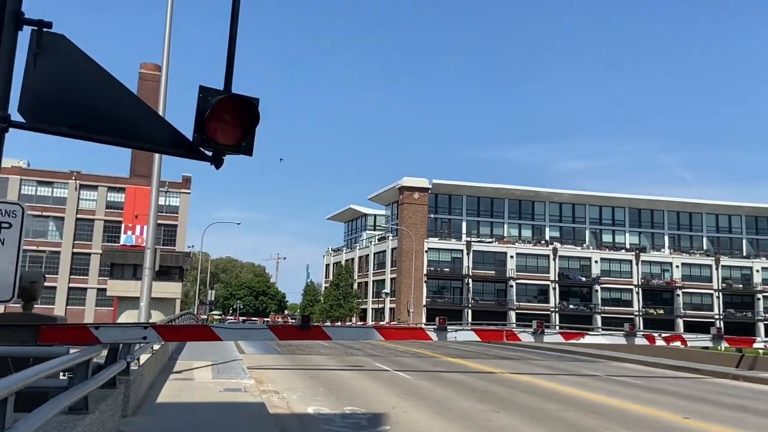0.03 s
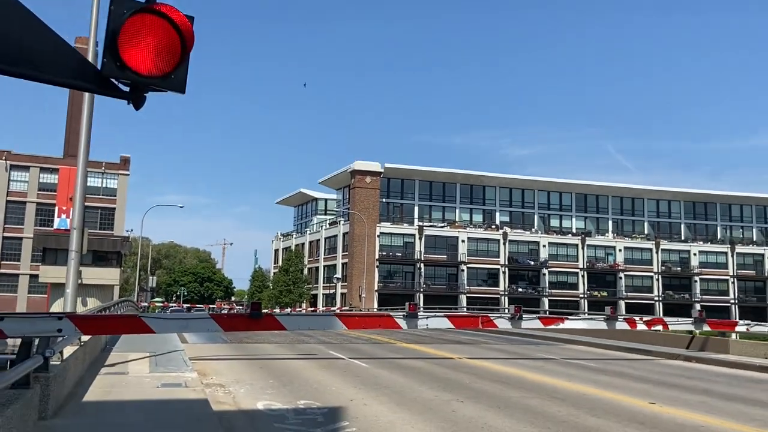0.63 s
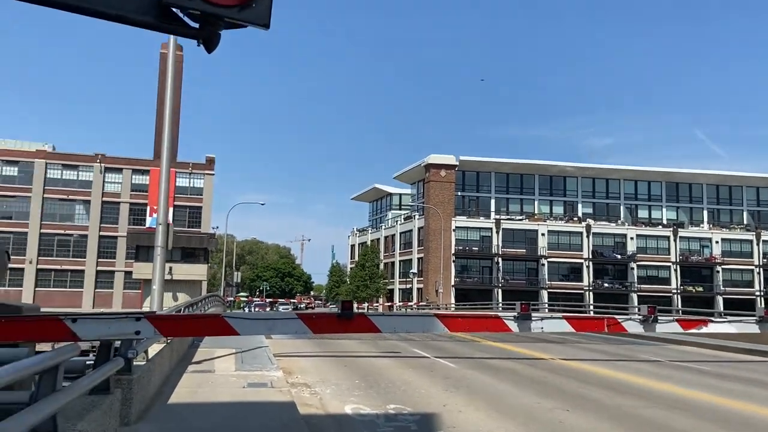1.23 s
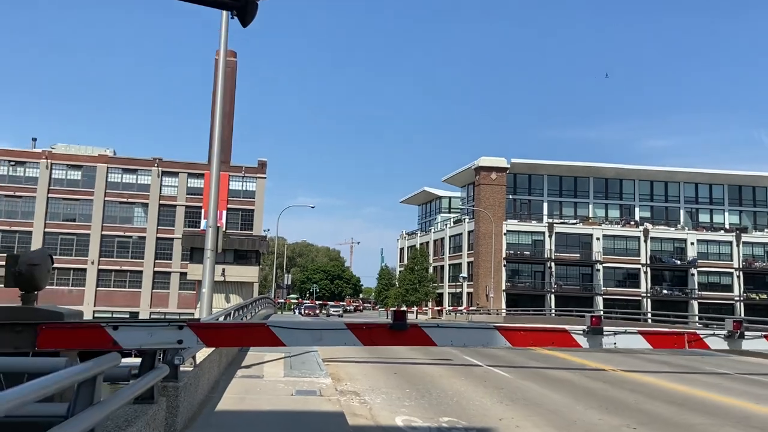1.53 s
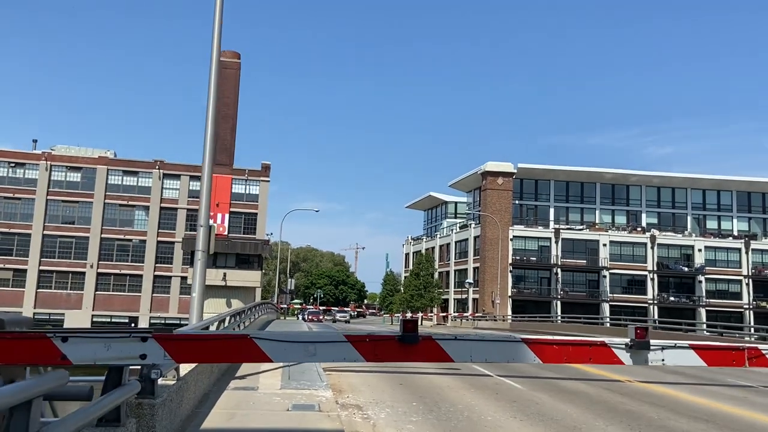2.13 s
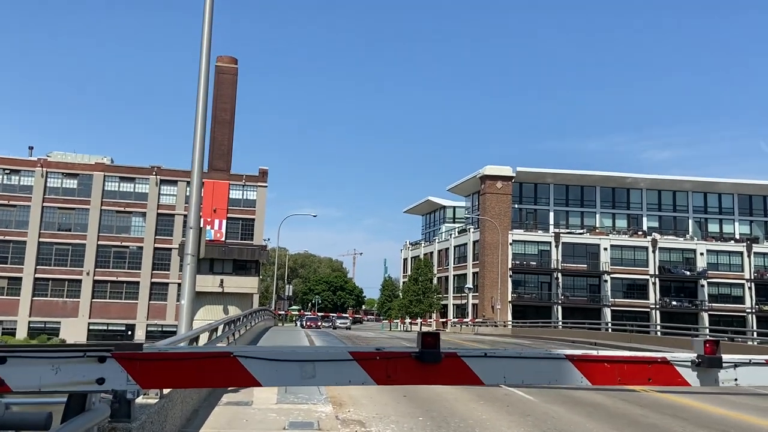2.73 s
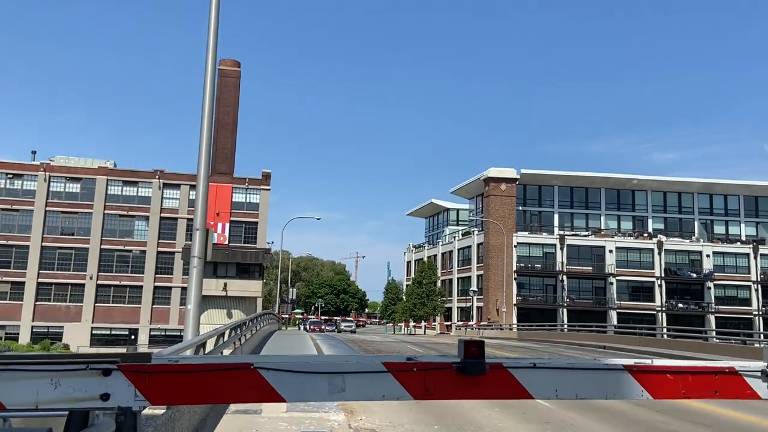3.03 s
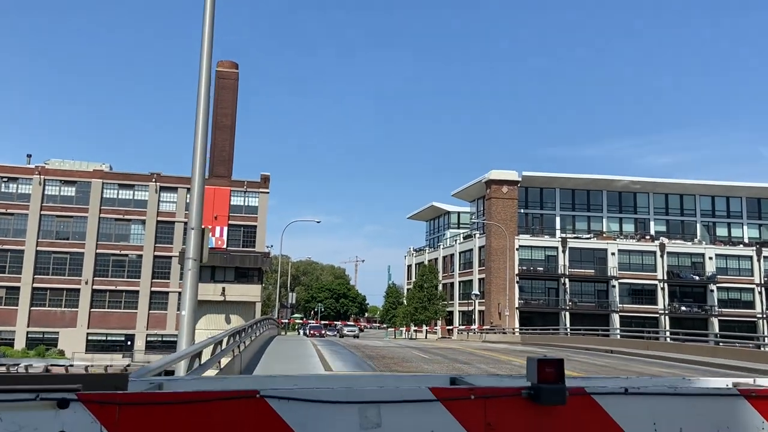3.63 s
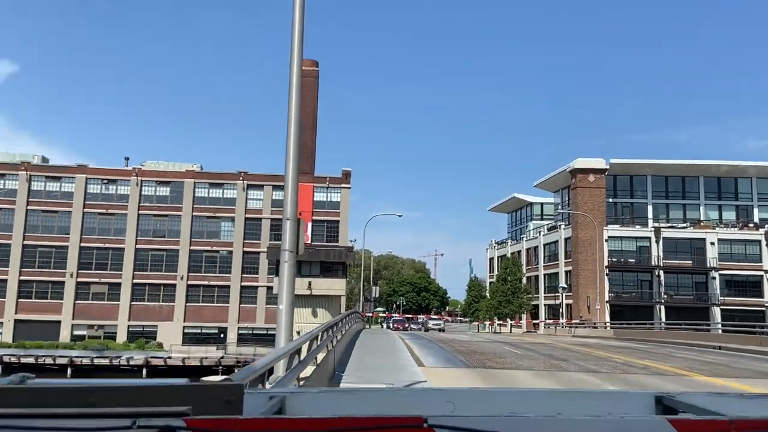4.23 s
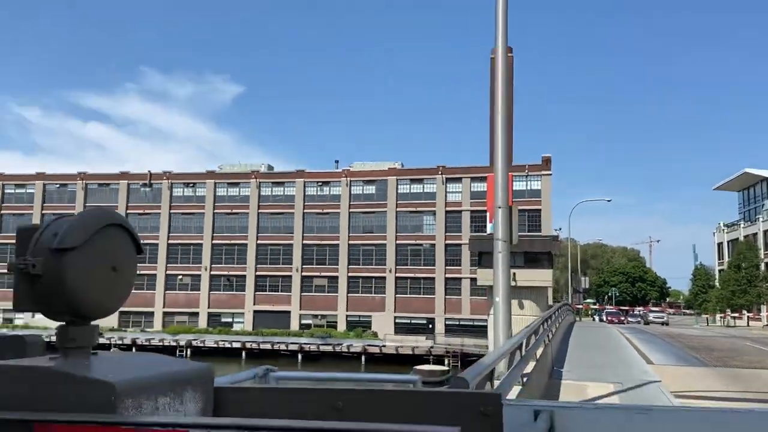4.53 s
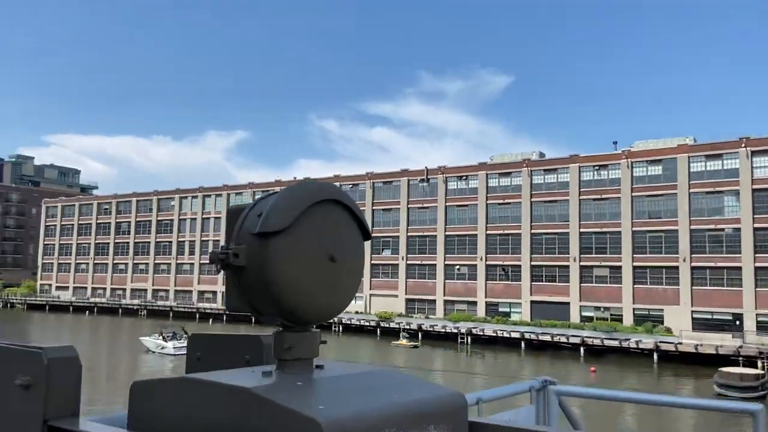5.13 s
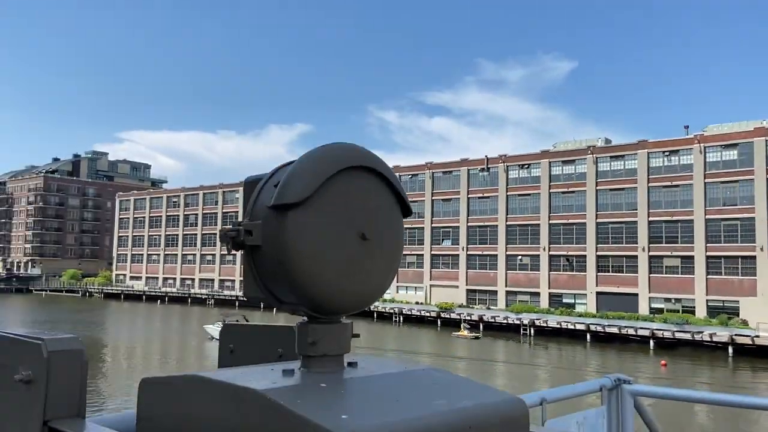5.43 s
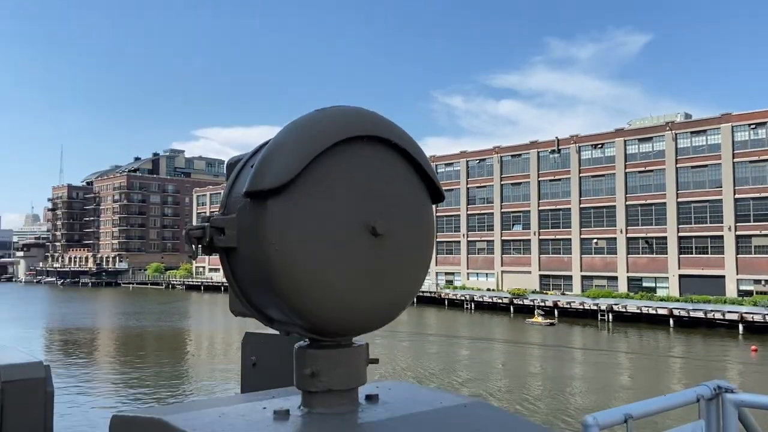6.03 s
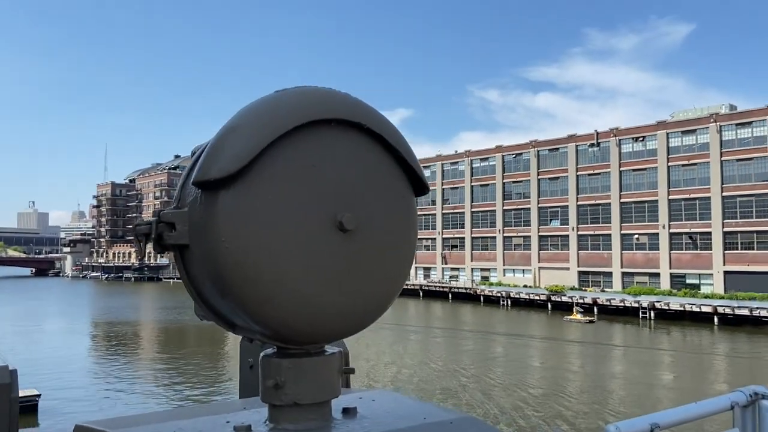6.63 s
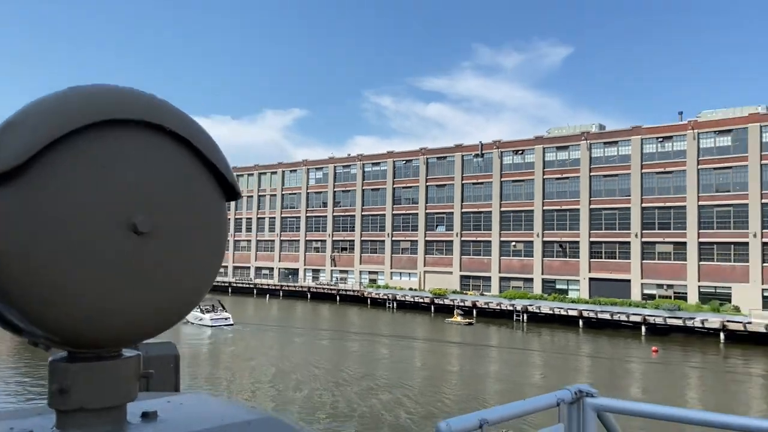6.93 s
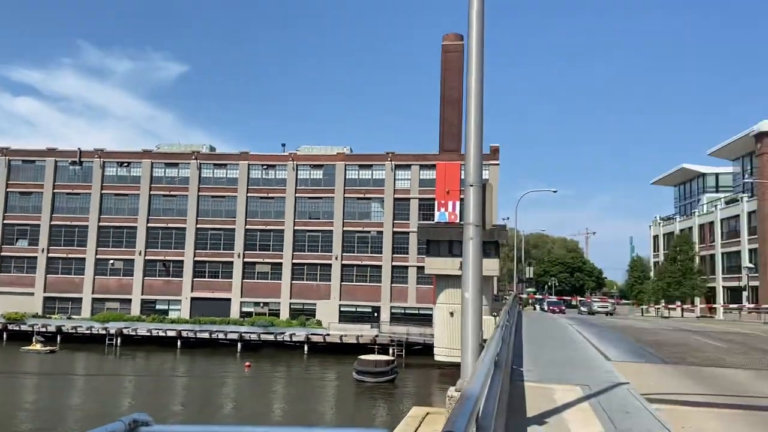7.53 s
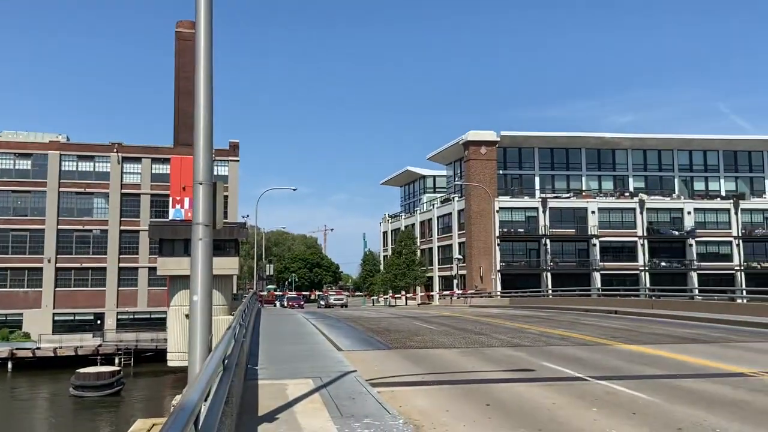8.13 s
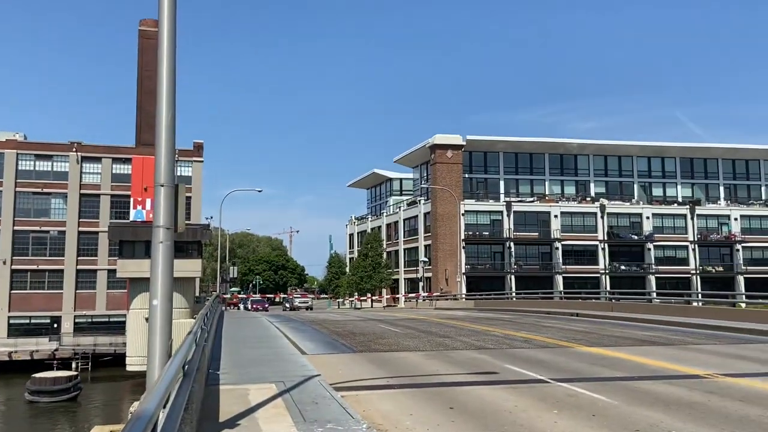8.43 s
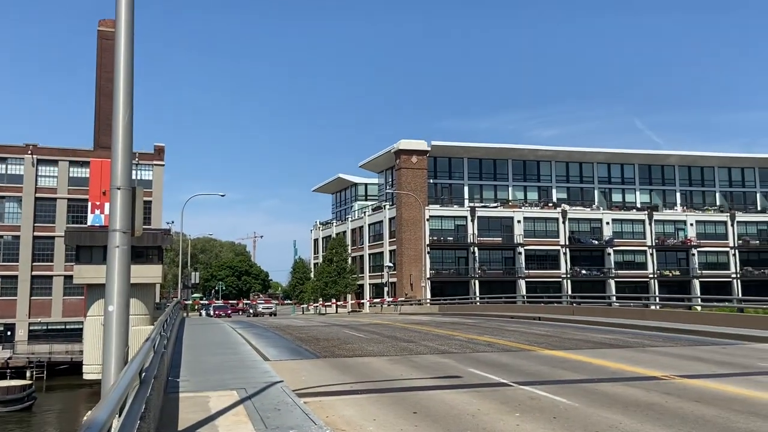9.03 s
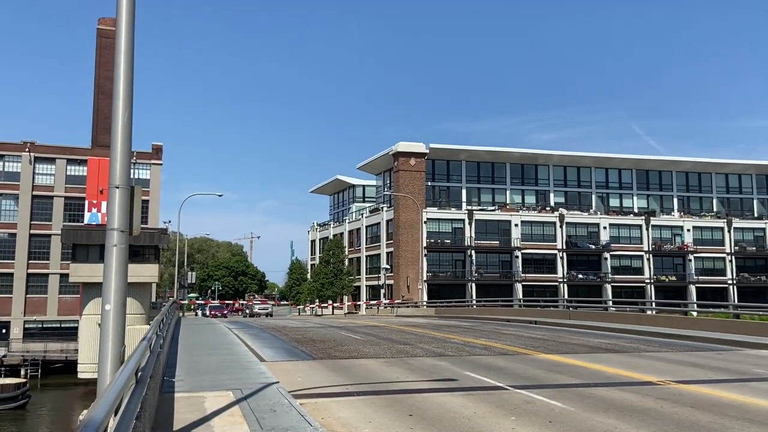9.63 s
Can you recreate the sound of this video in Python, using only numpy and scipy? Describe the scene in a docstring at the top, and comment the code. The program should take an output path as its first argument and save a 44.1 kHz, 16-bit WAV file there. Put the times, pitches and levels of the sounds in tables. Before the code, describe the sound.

A metal warning gong clangs rapidly and steadily at a bridge gate, over a fainter distant gong and low traffic rumble.

```python
"""Warning gongs at a bridge gate

On foot by the river, with a stereo microphone pair: we walk up to a motor-driven gong beside the gate,
face it at close range and turn away. It is struck 3.7 times a second, each blow a latch click, a clank
of the housing and the ringing of the steel dish. A second gong answers from across the bridge.
Traffic rumbles underneath and an engine idles."""
import sys
import numpy as np
from scipy import signal
from scipy.fft import rfft, irfft, next_fast_len
from scipy.io import wavfile

SR = 44100
rng = np.random.default_rng(int(sys.argv[2]) if len(sys.argv) > 2 else 0)


def unload_wav(signal):
    """Save mono or channel-first audio to the path in sys.argv[1] as 16-bit WAV at rate SR, clipped to [-1, 1]."""
    wavfile.write(
        sys.argv[1],
        SR,
        np.round(np.clip(np.atleast_2d(signal).T, -1, 1) * 32767).astype(np.int16),
    )


N = 431298
TIME = np.arange(N) / SR
HUM_BELOW_HZ, TOP_ABOVE_HZ = 1800, 7000

# hammer blows on the near gong; mellow ones favour the lower partials: start_s, level_db, mellowness_db
STRIKES = [(0.0962, -19.5, 1), (0.3646, -18.5, -2.0), (0.632, -18.5, -2.5), (0.8944, -15.5, -0.5),
           (1.1667, -16, -1), (1.4416, -18, 7), (1.714, -19.5, 6), (1.9864, -16.5, 3.5),
           (2.2543, -16.5, 1.5), (2.5222, -17.5, -2.5), (2.801, -16, -7.5), (3.0714, -12.5, -1.5),
           (3.3403, -15, 0), (3.6037, -15, -0.5), (3.8741, -15, -1), (4.146, -14, -0.5), (4.4104, -14.0, 1),
           (4.6811, -16, -1.5), (4.9606, -15.5, -5.5), (5.2315, -14.5, -2.5), (5.5059, -16, -4.5),
           (5.7758, -14.5, -2), (6.0462, -14, -2.5), (6.3121, -13, -2.5), (6.576, -15, -4),
           (6.8478, -16, -8), (7.1166, -14, -5.5), (7.3816, -15.5, -7.5), (7.6565, -15.5, -4),
           (7.9214, -16.5, -8.5), (8.1858, -17, 0), (8.453, -15.5, 0), (8.7226, -19, 1.5), (8.99, -15, 0.5),
           (9.2589, -14.5, -2), (9.5327, -14.5, 0.5)]
# modes of the near steel dish: pitch_hz, level_db, t60_s
DISH_MODES = [(612.5, -52, 4.3), (1072.4, -40, 1.26), (1579.7, -31.5, 0.96), (2133, -30.5, 0.83),
              (2540, -31, 0.2), (2720.5, -21.5, 0.37), (3284, -20, 0.11), (3350, -17, 0.29),
              (3808, -20.5, 0.14), (4031, -26.5, 0.26), (4778, -16, 0.11), (4911, -22, 0.22),
              (5562, -24.5, 0.17), (6017, -29.5, 0.28), (6399, -19, 0.16), (5750, -28.5, 0.069),
              (6880, -58.5, 0.13), (7284, -17.5, 0.13), (8230, -22.5, 0.13), (8630, -38, 0.075),
              (8900, -38, 0.18), (9500, -40, 0.047), (10650, -38, 0.14), (11020, -44.5, 0.25),
              (11490, -37, 0.1), (12400, -45.5, 0.13), (13300, -47.5, 0.107), (14200, -41.5, 0.098)]
# the microphones' path; stage is 0 along the gate, 1 facing the dish, 2 or more with the gong behind:
# time_s, closeness_db, stage, left_lead_ms, left_minus_right_db
WALK = [(0, -19, 0.34, .17, 0), (1.2, -14.5, 0.0098, .15, 1), (3.2, -9, 0.25, 0.17, 2),
        (4.2, -1, 0.14, 0.24, -3), (4.9, 4.5, 0.86, -0.047, 2.5), (5.6, 12.5, 1, -0.035, -0.5),
        (6.3, 12, 1.18, -0.031, 1.3), (6.9, 14, 1.38, -0.0076, 3), (7.4, 5.5, 1.56, 0.272, 2.5),
        (8.1, 5.5, 1.85, 0.44, 5), (9.78, 7.5, 3.24, 0.41, 4.5)]
# how alike street noise is at the two microphones: frequency_hz, correlation
LIKENESS = [(30, 0.94), (70, 0.92), (150, 0.85), (300, 0.45), (600, 0.04), (1500, 0.023), (5000, 0.054),
            (8000, 1)]


def from_db(db):
    """Decibels to gain."""
    return 10 ** (np.asarray(db) / 20)


def at_times(rows, when):
    """Columns of a curve table at the given times."""
    times, *columns = np.transpose(rows)
    return [np.interp(when, times, column) for column in columns]


def at_hz(points, hz):
    """Read a spectrum on a log-frequency axis."""
    knots, values = np.transpose(points)
    return np.interp(np.log(hz + 1e-9), np.log(knots), values)


def drift(rate_hz):
    """Slow random wander of about unit size."""
    knots = rng.standard_normal(int(rate_hz * 10) + 3)
    return np.interp(TIME * rate_hz, np.arange(len(knots)), knots)


def clicks(when, sizes):
    """One click at each time."""
    out = np.zeros(N)
    out[np.clip(np.round(when * SR).astype(int), 0, N - 1)] = sizes
    return out


def ring(drive, hz, t60):
    """A unit click sets a sine of height 1 ringing down."""
    decay, step = from_db(-60 / (t60 * SR)), 2 * np.pi * hz / SR
    return signal.lfilter([0, np.sin(step)], [1, -2 * decay * np.cos(step), decay ** 2], drive + 1e-18)


def dying(drive, t60):
    """Each click starts an exponential fade."""
    return signal.lfilter([1], [1, -from_db(-60 / (t60 * SR))], drive + 1e-18)


def noise(spectrum, likeness):
    """Stereo noise of rms 1 from a spectrum (frequency_hz, level_db) and a left-right likeness."""
    size = next_fast_len(N)
    hz = np.arange(size // 2 + 1) * SR / size
    low_hz, high_hz = spectrum[0][0] / 2, spectrum[-1][0]
    rolloff = 1 / np.sqrt((1 + (low_hz / (hz + 1)) ** 8) * (1 + (hz / high_hz) ** 8))
    mid, side = rfft(rng.standard_normal((2, size))) * from_db(at_hz(spectrum, hz)) * rolloff
    alike = np.clip(at_hz(likeness, hz), -1, 1)
    pair = irfft(np.sqrt(1 + alike) * mid + np.sqrt(1 - alike) * side * [[1], [-1]], size)[:, :N]
    return pair / np.sqrt(np.mean(pair ** 2) + 1e-20)


def blows():
    """For each blow: start_s, strength against the average blow in dB, microphone closeness in dB."""
    when, db, _ = np.transpose(STRIKES)
    return when, db - db.mean(), at_times(WALK, when)[0]


def colour_db(hz):
    """Gain of a pitch at each blow: the dish beams it to the microphones, the blow's mellowness tilts it."""
    # facing the dish, against the gate side: frequency_hz, gain_db
    facing = [(600, 5.5), (850, -4.5), (1070, 4.5), (1400, 22.5), (1580, 11.5), (2130, 5), (2720, 2.5),
              (3350, 0.5), (3900, 1.5), (4850, -4.5), (6000, -1.5), (7500, -1.5), (12000, 5.5)]
    # with the dish behind, against the gate side: frequency_hz, gain_db
    behind = [(600, 1), (850, -19.5), (1070, 0), (1400, 15), (1580, -1.5), (2130, -6), (2720, 4.5),
              (3350, -6), (3900, 4), (4850, -0.5), (6000, -3.5), (7500, -6.5), (12000, -5.5)]
    # how much of a blow's mellowness each pitch takes: frequency_hz, share
    mellow_tilt = [(900, 0.55), (1580, 0.73), (2800, 0.7), (3600, 0.03), (4800, -0.76), (7300, -0.2),
                   (11000, 0)]
    when, _, mellow_db = np.transpose(STRIKES)
    stage = at_times(WALK, when)[1]
    beam_db = np.interp(stage, [0, 1, 2], [0, at_hz(facing, hz), at_hz(behind, hz)])
    return beam_db + mellow_db * at_hz(mellow_tilt, hz)


def from_bearing(x):
    """The gong's bearing along the walk sets the delay and balance between the microphones."""
    left, right = np.broadcast_to(x, (2, N))
    lead_ms, pan_db = at_times(WALK, TIME)[2:]
    late = np.arange(N) - lead_ms * SR / 1000
    pan = from_db(pan_db / 2)
    return np.array([left * pan, np.interp(late, np.arange(N), right) / pan])


def traffic(trim_db=-0.5, swell_width_s=0.13):
    """Low road rumble that swells now and then, under the roar of tyres."""
    # traffic grows fainter along the walk: time_s, rumble_db, roar_db
    levels = [(0, -35.5, -32), (2, -31.5, -32.5), (2.9, -32.5, -35), (3.6, -35, -33), (4.5, -30.5, -34),
              (5.1, -39.5, -37.5), (7.7, -39, -42.5), (9.78, -41, -40.5)]
    # brief swells of the rumble: peak_s, rise_db
    swells = [(0.299, 6), (.76, 8), (2.5, 5.5), (5.52, 10)]
    # road rumble: frequency_hz, level_db
    rumble_spectrum = [(13, -49), (22, -36), (44, -6.5), (75, 0.5), (114, -10.5), (146, -2.5), (177, -26),
                       (260, -14), (340, -21), (570, -120)]
    # tyre roar: frequency_hz, level_db
    roar_spectrum = [(150, 3), (220, 2.5), (320, -1.5), (450, -7.5), (700, -9.5), (1200, -15),
                     (2500, -18.5), (4500, -26.5), (7500, -31.5), (10000, -45.5), (15000, -46)]
    rumble_db, roar_db = at_times(levels, TIME)
    swell_db = sum(db * np.exp(-((TIME - peak_s) / swell_width_s) ** 2) for peak_s, db in swells)
    rumble = from_db(rumble_db + swell_db) * noise(rumble_spectrum, LIKENESS)
    roar = from_db(roar_db) * noise(roar_spectrum, LIKENESS)
    return from_db(trim_db) * (rumble + roar)


def idling_engine(wander_hz=0.88, waver_db=7.0):
    """An engine idles by the river: three low tones, unsteady in pitch and level."""
    # engine tones: pitch_hz, centre_rms_db
    tones = [(44, -50.5), (60, -55.5), (88, -49)]
    out = np.zeros(N)
    for hz, db in tones:
        height = np.sqrt(2) * from_db(db + waver_db * drift(3))
        cycles = np.cumsum(hz + wander_hz * drift(3.2)) / SR
        out += height * np.sin(2 * np.pi * cycles)
    return out


def far_gong(first_s=0.0647, period_s=0.32636, slowing_s=0.000188, level_db=2.0, accent_db=6,
             scatter_db=3, tick_db=-42, tick_t60=0.055, count=30):
    """The gong across the bridge runs slower and keeps slowing; every tenth blow lands harder."""
    # modes of the far dish: pitch_hz, level_db, t60_s
    far_modes = [(2298, -52, .6), (2939, -47, .5), (3305, -51, .2), (3703, -49, .2), (4349, -49, .2),
                 (5119, -52, .2), (5927, -54, .15), (6793, -57, .13), (7703, -55, .13), (9668, -63, .12)]
    k = np.arange(count)
    when = first_s + period_s * k + slowing_s * k ** 2 / 2
    blow_db = level_db + accent_db * (k % 10 == 3)
    ringing = np.zeros(N)
    for hz, db, t60 in far_modes:
        level = db + blow_db + scatter_db * rng.standard_normal(count)
        ringing += ring(clicks(when, from_db(level)), hz, t60)
    tick = noise([(2000, 1), (3500, 20), (7500, -13), (9000, -23), (14000, -20)], LIKENESS)
    return ringing + dying(clicks(when, from_db(tick_db + blow_db)), tick_t60) * tick


def hammer(latch_db=-27, latch_t60=0.12, latch_lead_s=0.009, crack_db=-22, crack_t60=0.032,
           bounce_s=0.0025, bounce_db=-4, wash_db=-35, wash_t60=0.36, close_share=0.12, beam_hz=7500):
    """The latch lets go with a click; the hammer cracks on the steel, chatters twice and leaves a wash."""
    # the latch's click: frequency_hz, level_db
    latch_spectrum = [(300, 3.5), (900, -16), (1400, 0.5), (2100, 6), (2900, 0), (4200, -0.5), (7300, -1.5),
                      (9000, -11.5), (12000, -19.5), (15500, -7)]
    # the hammer's contact with the dish: frequency_hz, level_db
    crack_spectrum = [(300, -23), (1000, -35), (2000, -17.5), (3300, 11), (5000, 6), (7300, 11),
                      (9000, -12), (11000, -10.5), (13800, -37), (15500, -35)]
    when, blow_db, close_db = blows()
    latch = dying(clicks(when - latch_lead_s, from_db(latch_db + close_db / 2)), latch_t60)
    force = from_db(blow_db + close_share * close_db + colour_db(beam_hz))
    touches = np.zeros(N)
    for bounce in range(3):
        late_s = bounce * bounce_s * rng.uniform(0.8, 1.2, len(when))
        touches += clicks(when + late_s, force * from_db(bounce * bounce_db))
    crack = from_db(crack_db) * dying(touches, crack_t60)
    wash = from_db(wash_db) * dying(clicks(when, force), wash_t60)
    likeness = [(500, 0.086), (5000, 0.6), (8000, 1.0)]
    return (crack + wash) * noise(crack_spectrum, likeness) + latch * noise(latch_spectrum, likeness)


def hum(scatter_db=1.5, blow_share=0.24, close_share=0.095):
    """The lowest modes of the dish ring on between blows: each blow tops up their energy."""
    when, blow_db, close_db = blows()
    drive_db = blow_share * blow_db + close_share * close_db
    out = np.zeros(N)
    for hz, db, t60 in DISH_MODES:
        if hz < HUM_BELOW_HZ:
            level = db + drive_db + colour_db(hz) + scatter_db * rng.standard_normal(len(when))
            energy = dying(clicks(when, from_db(level) ** 2), t60 / 2)
            out += np.sqrt(energy) * np.sin(2 * np.pi * (hz * TIME + rng.random()))
    return out


def partials(low_hz, high_hz, scatter_db, mic_scatter_db, close_share):
    """Each blow rings a band of dish modes; reflections off the box vary their level at each microphone."""
    when, blow_db, close_db = blows()
    drive_db = blow_db + close_share * close_db
    out = np.zeros((2, N))
    for hz, db, t60 in DISH_MODES:
        if low_hz <= hz < high_hz:
            level = db + drive_db + colour_db(hz) + scatter_db * rng.standard_normal(len(when))
            sign = rng.choice([-1, 1], len(when))
            for channel in out:
                sizes = sign * from_db(level + mic_scatter_db * rng.standard_normal(len(when)))
                channel += ring(clicks(when, sizes), hz, t60)
    return out


def clang(level_db=-2, t60=0.061, spread_hz=70, rebound_s=0.003):
    """The hammer's rebound stirs a short-lived neighbour beside each middle mode."""
    when, blow_db, _ = blows()
    out = np.zeros(N)
    for hz, db, _ in DISH_MODES:
        if HUM_BELOW_HZ <= hz < TOP_ABOVE_HZ:
            sizes = rng.standard_normal(len(when)) * from_db(level_db + db + blow_db + colour_db(hz))
            rebounds = clicks(when + rebound_s * rng.random(len(when)), sizes)
            out += ring(rebounds, hz + spread_hz * rng.uniform(-0.8, 1), t60)
    return out


def sheen(level_db=-38.5, t60=0.12, close_share=0.31, blow_share=0.5, count=14):
    """A crowd of weak, short modes of the dish fills the treble, mostly at close range."""
    when, blow_db, close_db = blows()
    pitches = np.linspace(10000, 14200, count) + rng.uniform(-90, 90, count)
    level = level_db + blow_share * blow_db + close_share * close_db + colour_db(pitches.mean())
    sizes = rng.standard_normal((len(when), count)) * from_db(level)[:, None]
    return sum(ring(clicks(when, size), hz, t60) for hz, size in zip(pitches, sizes.T))


def dish():
    """The near steel dish: a lasting hum, ringing middle modes with a short clang, and bright top modes."""
    middle = partials(HUM_BELOW_HZ, TOP_ABOVE_HZ, scatter_db=1.3, mic_scatter_db=4.0, close_share=-0.02)
    top = partials(TOP_ABOVE_HZ, SR / 2, scatter_db=5.0, mic_scatter_db=0.25, close_share=0.059)
    return from_bearing(hum() + middle + clang()) + top + sheen()


def housing(scatter_db=2.5, blow_share=0.13, close_share=0.45, beam_share=0.45):
    """The recoil shakes a clank out of the cast housing and its hood."""
    # modes of housing and hood: pitch_hz, level_db, t60_s
    housing_modes = [(228.8, -47, 0.58), (307.3, -38, 0.27), (528, -44, 0.33), (838, -30.5, 0.15),
                     (1281, -32.5, 0.031), (1408, -41.5, 0.12), (1860, -42, 0.02), (2083, -22, 0.1),
                     (3060, -27, 0.05)]
    when, blow_db, close_db = blows()
    drive_db = blow_share * blow_db + close_share * close_db
    out = np.zeros(N)
    for hz, db, t60 in housing_modes:
        level = db + drive_db + beam_share * colour_db(hz) + scatter_db * rng.standard_normal(len(when))
        sign = rng.choice([-1, 1], len(when))
        out += ring(clicks(when, sign * from_db(level)), hz, t60)
    return from_bearing(out)


def post_knock(level_db=-32, t60=0.21, attack_t60=0.042, close_share=0.47):
    """The post and the box under the gong take up the recoil with a dull, broad knock."""
    spectrum = [(200, 0), (310, -5), (420, -21), (560, -5.5),
                (800, 1), (1050, -1.5), (1400, 8.5), (2100, 11.5)]
    when, _, close_db = blows()
    recoil = clicks(when, from_db(level_db + close_share * close_db))
    return (dying(recoil, t60) - dying(recoil, attack_t60)) * noise(spectrum, LIKENESS)


def street_echo(x, echo_db=-25, t60=0.3, dull_hz=3500, delay_s=0.14):
    """Railings, deck and far walls scatter a faint, dull tail."""
    t = np.arange(SR) / SR
    tail = rng.standard_normal((2, SR)) * from_db(-60 * t / t60) * (t > delay_s)
    tail /= np.sqrt(np.sum(tail ** 2) / 2)
    tail = signal.sosfilt(signal.butter(2, dull_hz, fs=SR, output="sos"), tail)
    return from_db(echo_db) * signal.fftconvolve(x, tail, axes=1)[:, :N]


def scene():
    """Both gongs in the open street, over the engine and the traffic."""
    gongs = dish() + housing() + post_knock() + hammer() + far_gong()
    return gongs + street_echo(gongs) + idling_engine() + traffic()


def record(dry, ceiling=1.3, cutoff_hz=15700):
    """Peaks are rounded, the microphone pair turns the treble phase of one side, the top is cut."""
    # phase lag of the right microphone behind the left: frequency_hz, lag_rad
    mic_phase = [(5500, 0), (7300, 1.3), (8200, 2.4), (9200, 3.14), (10270, 4.3), (11000, 5.2),
                 (12000, 6.2), (13300, 6.6), (14400, 9.2)]
    size = next_fast_len(N + 2000)
    lag = np.interp(np.arange(size // 2 + 1) * SR / size, *np.transpose(mic_phase))
    left, right = ceiling * np.tanh(dry / ceiling)
    right = irfft(rfft(right, size) * np.exp(-1j * lag), size)[:N]
    return signal.sosfilt(signal.ellip(10, 0.2, 80, cutoff_hz, fs=SR, output="sos"), [left, right])


dry = scene()
out = record(dry)
unload_wav(out)
```